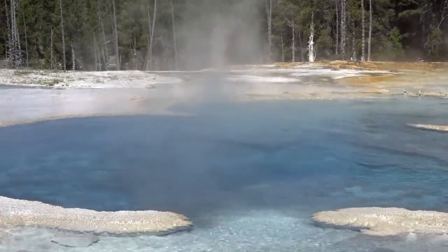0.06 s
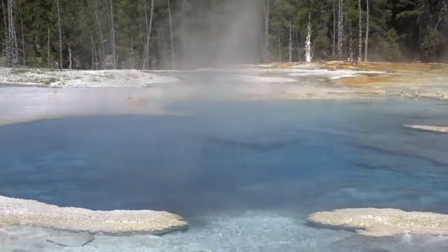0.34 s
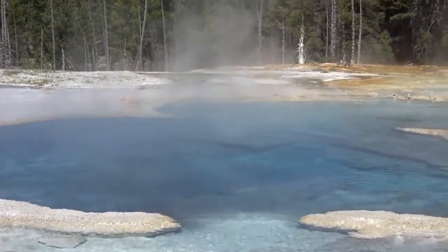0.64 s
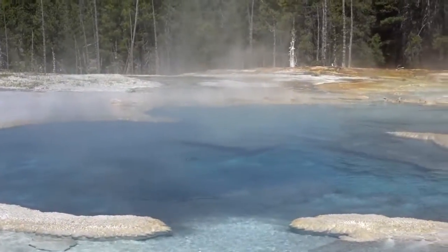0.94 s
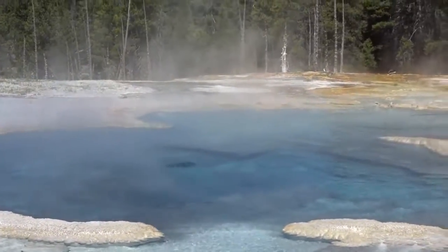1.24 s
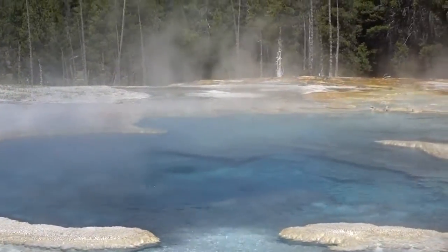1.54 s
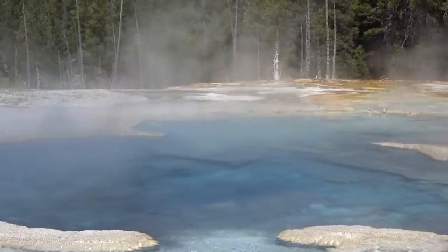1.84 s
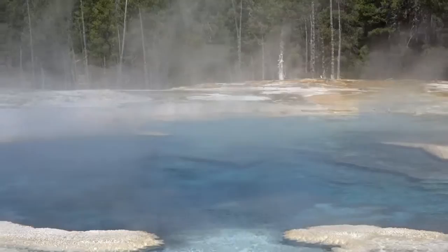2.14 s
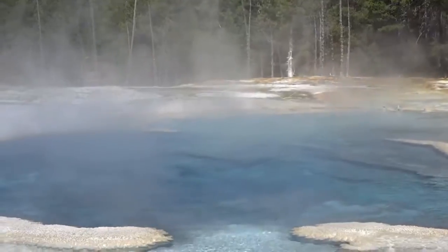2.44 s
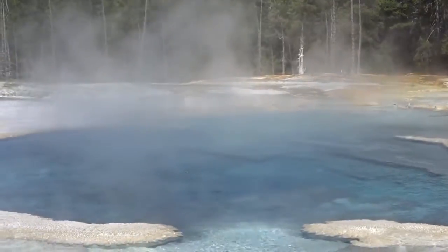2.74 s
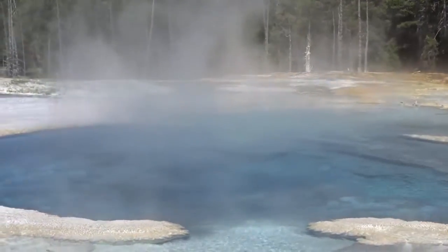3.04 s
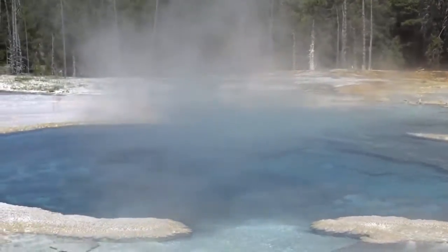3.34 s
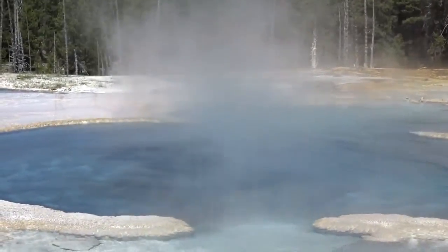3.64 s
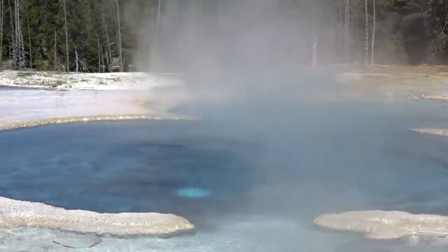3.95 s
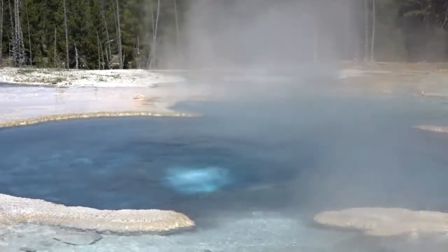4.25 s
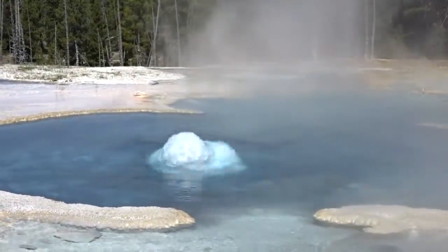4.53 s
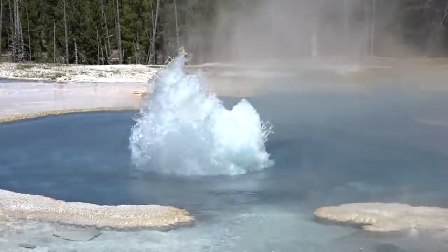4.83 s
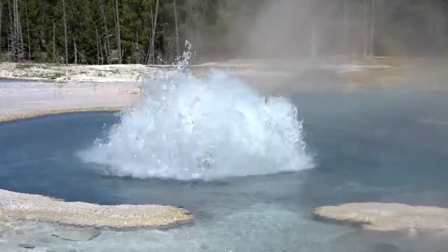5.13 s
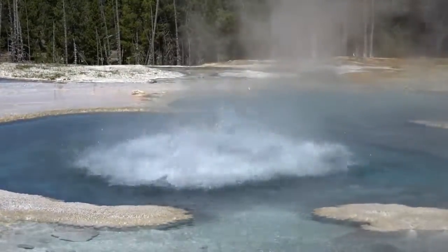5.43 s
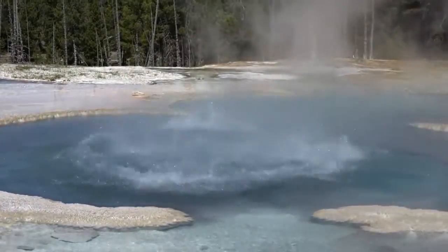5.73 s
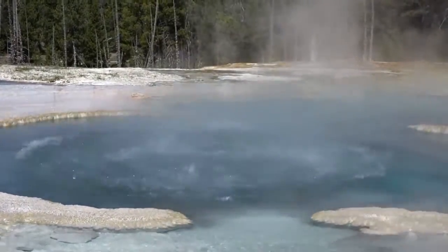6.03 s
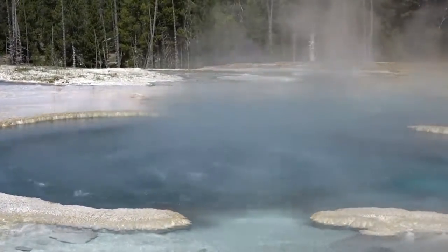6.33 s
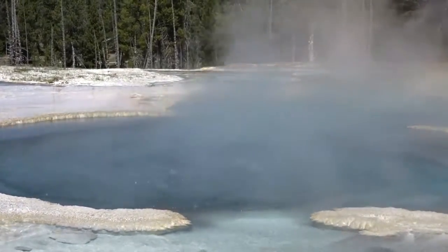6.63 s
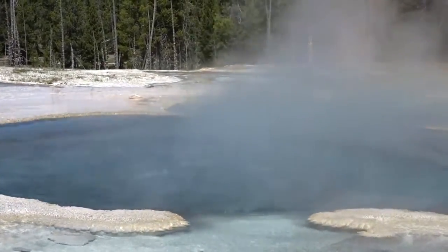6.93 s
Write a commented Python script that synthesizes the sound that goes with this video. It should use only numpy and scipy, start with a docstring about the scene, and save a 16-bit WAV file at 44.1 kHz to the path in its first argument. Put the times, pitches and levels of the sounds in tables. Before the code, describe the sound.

Gusty wind thumps on the microphone outdoors before a gas bubble erupts from a hot pool, raining water down in a splash.

```python
"""A hot spring pool in the open, heard from its edge on a stereo microphone.
Puffs of breeze hiss past on the left and set hollows sounding; spurts of fizz and a few close ticks
come between them. Gusts buffet the microphone as their eddies cross its two ports. Then a gas bubble
bursts: the thrown water rains back as a rush of drops and ringing bubbles, and the foam fizzes away."""
import sys
import numpy as np
from scipy import signal
from scipy.fft import rfft, irfft
from scipy.io import wavfile
from scipy.ndimage import uniform_filter1d

SR = 44100
rng = np.random.default_rng(int(sys.argv[2]) if len(sys.argv) > 2 else 0)


def int16_out(signal):
    """Quantize to a 16-bit WAV file."""
    q = np.round(np.clip(np.atleast_2d(signal).T, -1, 1) * 32767)
    wavfile.write(sys.argv[1], SR, q.astype(np.int16))


N = 307818
TIME = np.arange(N) / SR
FREQ = np.arange(N // 2 + 1) * SR / N

# the strongest eddies to hit the microphone: t/s, level/dB, centre f/Hz
THUMPS = [(0.027, -19, 395), (0.036, -14.5, 710), (0.049, -17, 430), (0.064, -37, 520), (0.098, -23.5, 536),
          (0.152, -24, 424), (0.173, -24, 650), (0.339, -27, 520), (0.345, -6.5, 596), (0.3535, -18, 615),
          (0.359, -26, 560), (0.372, -16, 776), (0.3785, -20, 540), (0.3835, -17, 620), (0.401, -17, 636),
          (0.41, -26, 540), (0.437, -23, 497), (0.4525, -8, 640), (0.457, -23, 450), (0.466, -23, 556),
          (0.476, -25, 620), (0.525, -20.5, 390), (0.532, -19, 450), (0.542, -15, 434), (0.567, -21.5, 460),
          (0.58, -16.5, 530), (0.592, -25, 370), (0.622, -28, 474), (0.644, -21, 387), (0.687, -26, 500),
          (0.7255, -20, 750), (0.7285, -19.5, 372), (0.734, -26, 400), (0.744, -25, 390), (0.754, -19, 470),
          (0.767, -8, 604), (0.776, -21.5, 690), (0.792, -24, 460), (0.820, -26, 580), (0.8275, -9.5, 710),
          (0.8297, -13.5, 710), (0.846, -34, 480), (0.867, -26, 420), (0.884, -29, 340),
          (0.896, -21.5, 695), (0.922, -21, 455), (1.004, -26.5, 380), (1.04, -28.5, 490),
          (1.048, -34, 463), (1.596, -41.5, 267), (1.771, -33.5, 347), (1.927, -23.5, 364),
          (2.009, -37, 350), (2.021, -34, 360), (2.033, -26.5, 380), (2.053, -23, 480), (2.094, -27.5, 420),
          (2.205, -27.5, 350), (2.238, -40, 650), (3.321, -30, 400), (3.332, -24, 410), (3.355, -26, 570),
          (3.366, -23, 390), (3.376, -21.5, 364), (3.383, -30, 290), (3.401, -22, 450), (3.492, -27, 420),
          (3.4965, -19, 470), (3.505, -28.5, 330), (3.514, -22.5, 430), (3.52, -19.5, 350),
          (3.53, -23, 302), (3.546, -32, 420), (3.571, -26.5, 437), (3.579, -32, 378), (3.637, -26, 464),
          (3.767, -34.5, 312), (3.775, -34, 314), (3.856, -38.5, 390), (4.634, -31.5, 264),
          (4.656, -36, 294), (4.671, -30, 298), (4.699, -26, 570), (4.731, -18.5, 427), (4.748, -19.5, 316),
          (4.803, -17.5, 380), (4.809, -21, 620), (4.879, -25.5, 453), (5.584, -21.5, 503),
          (5.689, -26.5, 294), (6.07, -37, 300), (6.972, -35, 340)]


def from_db(db):
    """Decibels to gain."""
    return 10 ** (np.asarray(db) / 20)


def rms_one(x):
    """Scale to unit rms."""
    return x / np.sqrt(np.mean(x ** 2) + 1e-20)


def curve(points):
    """Spread rows of (f/Hz, value) over FREQ, on a log-frequency axis."""
    hz, values = np.transpose(points)
    return np.interp(np.log(FREQ + 1e-9), np.log(hz), values)


def drift(rate_hz):
    """Random wavering, mostly slower than rate_hz; rms 1."""
    return rms_one(irfft(rfft(rng.standard_normal(N)) / (1 + (FREQ / rate_hz) ** 2), N))


def butter(x, hz, kind, order=2):
    """Causal high-, low- or band-pass."""
    return signal.sosfilt(signal.butter(order, hz, kind, fs=SR, output="sos"), x)


def noise_band(hz, width_hz):
    """An airy note: noise around one pitch; rms 1."""
    edges = [max(hz - width_hz / 2, 10), hz + width_hz / 2]
    return rms_one(butter(rng.standard_normal(N), edges, "band"))


def placed(x, pan_db):
    """Set a source pan_db louder on the left than on the right."""
    return x * from_db(np.array([[pan_db], [-pan_db]]) / 2)


def colour(pair, spectrum, likeness, lag_ms=0, pan_db=0):
    """Two unrelated excitations become one stereo sound of this spectrum, lag_ms later on the left."""
    skirts = 1 / (1 + (spectrum[0][0] / (FREQ + 1)) ** 4) / (1 + (FREQ / spectrum[-1][0]) ** 16)
    mid, side = rfft(pair) * from_db(curve(spectrum)) * skirts
    alike, sides = np.clip(curve(likeness), -1, 1), np.array([[1], [-1]])
    stereo = np.sqrt(1 + alike) * mid + np.sqrt(1 - alike) * side * sides
    left, right = irfft(stereo * from_db(sides * pan_db / 2), N)
    left = np.interp(TIME - lag_ms / 1000, TIME, left)
    return np.array([left, right]) / np.std((left + right) / 2)


def plateau(start, hold_s, rise_db_per_s, fall_db_per_s):
    """Gain that rises to 1 at start, holds, then dies away."""
    before_db = rise_db_per_s * np.maximum(start - TIME, 0)
    after_db = fall_db_per_s * np.maximum(TIME - start - hold_s, 0)
    return from_db(-np.minimum(before_db + after_db, 200))


def swells(rows):
    """Bell-shaped swells (t/s, half-width/s, level/dB, ..) add in power; one gain per level column."""
    return np.sqrt(sum(from_db(levels)[:, None] ** 2 * np.exp(-np.minimum(((TIME - s) / width) ** 2, 50))
                       for s, width, *levels in rows))


def breeze():
    """A far murmur of air and water; each puff adds a rush and, from the left, hiss, rustle and air."""
    # passing puffs: t/s, half-width/s, then level/dB of rush, hiss, rustle and airy top
    puffs = [(0.08, 0.19, -48, -60, -71, -82), (0.5, 0.12, -48.5, -63, -75.5, -87),
             (0.92, 0.24, -52.5, -69.5, -73.5, -82.5), (1.13, 0.044, -50, -76, -81, -86),
             (1.25, 0.1, -52.5, -64, -78, -79.5), (1.39, 0.064, -51.5, -66, -80, -81),
             (1.65, 0.22, -50, -66, -79.5, -82), (2.26, 0.19, -51, -62, -79, -88),
             (2.58, 0.12, -54, -62.5, -71.5, -81), (3.45, 0.087, -62, -62.5, -86, -96),
             (3.69, 0.19, -52, -63, -87, -81), (4.5, 0.21, -62.5, -69.5, -91, -83),
             (6.8, 0.19, -62, -63.5, -73, -81)]
    # spectra of the murmur and of a puff's four sounds: f/Hz, level/dB
    murmur_spectrum = [(30, -46.5), (100, -34), (230, -23.5), (400, -7.5), (600, -2.5), (950, 1),
                       (1300, -0.5), (1900, -9), (3000, -19.5), (5000, -29), (8000, -32), (11000, -33.5)]
    rush_spectrum = [(300, -8), (600, -13), (900, -3), (1150, -4), (1340, -2.5), (1500, -13.5),
                     (1900, -18.5), (3000, -54)]
    hiss_spectrum = [(1200, -16), (1900, 10.5), (2400, 6), (3200, 2), (3700, -10), (5000, -17), (6500, -35)]
    rustle_spectrum = [(2800, -13), (3900, 5), (4800, -1.5), (5800, -5), (7500, -18), (8600, -24),
                       (10000, -16), (11500, -15)]
    airy_spectrum = [(6300, 1), (7800, -3), (8800, -6), (10000, -4), (11500, -9)]
    # how alike the two sides hear the air: f/Hz, correlation
    likeness = [(60, 0.97), (570, 0.88), (1200, 0.94), (2500, 0.11), (5300, 0.12), (11000, 0.23)]
    rush_gain, hiss_gain, rustle_gain, airy_gain = swells(puffs)
    white = rng.standard_normal((5, 2, N))
    murmur = colour(white[0], murmur_spectrum, likeness, lag_ms=0.078)
    rush = colour(white[1], rush_spectrum, likeness, lag_ms=0.13, pan_db=2)
    hiss = colour(white[2], hiss_spectrum, likeness, pan_db=16)
    rustle = colour(white[3], rustle_spectrum, likeness, pan_db=24)
    airy = colour(white[4], airy_spectrum, likeness, pan_db=19)
    return (murmur * from_db(-51 + 0.5 * drift(7.7))
            + rush * rush_gain * from_db(1.5 + drift(20))
            + hiss * hiss_gain * from_db(2 + 1.6 * drift(14))
            + rustle * rustle_gain * from_db(0.4 + 1.6 * drift(25))
            + airy * airy_gain * from_db(1.5 * drift(25)))


def hollow_notes():
    """Air blows across hollows a little to the left; each note swells and fades at its own pitch."""
    # notes of the hollows: t/s, half-width/s, level/dB, f/Hz, bandwidth/Hz
    notes = [(0.071, .15, -51.5, 1300, 220), (0.46, 0.097, -53, 1290, 290), (1.4, 0.056, -57, 1500, 170),
             (1.64, 0.077, -46.5, 1313, 140), (2.31, 0.14, -55, 1326, 190), (2.62, 0.1, -55, 1270, 87),
             (3.68, 0.12, -50.5, 1320, 140), (0.08, .17, -66, 2760, 300), (0.5, 0.08, -65.5, 2740, 400),
             (2.28, 0.089, -62.5, 2800, 430), (2.58, .11, -62.5, 2800, 300), (2.48, 0.21, -69, 3300, 350),
             (3.78, 0.11, -62.5, 2200, 280), (6.75, 0.24, -60, 1800, 290), (3.8, 0.14, -69.5, 3230, 250)]
    blown = sum(swells([(s, half_s, db)])[0] * noise_band(hz, width) for s, half_s, db, hz, width in notes)
    return placed(blown, pan_db=7)


def fizz(rise_db_per_s=400, fall_db_per_s=119):
    """Short spurts of fizz on the left: each starts quickly, holds its pitch and fades."""
    # spurts: t/s, hold/s, level/dB, f/Hz, bandwidth/Hz
    spurts = [(0.87, 0.055, -84, 10000, 700), (0.87, 0.085, -80, 5000, 600), (1.12, 0.096, -88, 9700, 900),
              (1.185, 0.06, -68, 3900, 1300), (1.576, 0.17, -66.5, 2500, 1100), (1.7, .06, -83, 6400, 1400),
              (2.12, 0.14, -68, 2860, 1600), (2.59, 0.012, -76, 7600, 650), (2.59, 0.032, -89, 10800, 500),
              (3.615, 0.09, -63, 2470, 990), (3.62, 0.15, -82, 4600, 350), (3.61, 0.28, -83.5, 6700, 980),
              (3.6, 0.14, -85, 9000, 1000)]
    fizzing = sum(from_db(db) * plateau(s, hold, rise_db_per_s, fall_db_per_s) * noise_band(hz, width)
                  for s, hold, db, hz, width in spurts)
    return placed(fizzing, pan_db=19)


def ticks(crack_gain=0.61, crack_s=0.0013, trim_db=-6):
    """Sharp ticks close by: each is a brief crack around its pitch and a few milliseconds of ring."""
    # ticks: t/s, level/dB, f/Hz, ring t60/s, left over right/dB
    hits = [(1.0012, -30, 2820, 0.012, 11), (2.5617, -29.5, 3500, 0.0052, 12.5),
            (5.879, -36, 9200, .003, -3), (6.612, -37, 2850, .009, 14), (6.623, -37, 3520, .007, -3),
            (6.848, -32.5, 2950, 0.0042, 10.5)]
    # modes of a tick: multiple of its pitch, level/dB
    modes = [(.8, -10), (1, 1), (1.17, -4), (1.46, -13), (1.8, -8), (2.5, -15)]
    out, t = np.zeros((2, N)), np.arange(900) / SR
    for s, db, hz, t60, pan_db in hits:
        noise = butter(rng.standard_normal((2, len(t))), [0.72 * hz, 1.16 * hz], "band", order=1)
        crack = crack_gain * rms_one(noise) * np.exp(-t / crack_s)
        tone = sum(from_db(mode_db) * np.sin(2 * np.pi * ratio * hz * t)
                   for ratio, mode_db in modes if ratio * hz < SR / 2)
        tone = butter(tone * from_db(-60 * t / t60), 5360, "low")   # higher modes ring more weakly
        at = round((s + 0.00082) * SR)
        out[:, at:at + len(t)] += from_db(db + trim_db) * placed(tone + crack, pan_db)
    return out


def turbulence(rise_db_per_s=203, wake_lead_s=0.015, wake_decay_s=0.021, lull_db=-89.5):
    """Strength of the air on the ports: fluttering gusts, the wakes of big eddies and a restless lull."""
    # gusts at the microphone: t/s, hold/s, level/dB, fall/(dB/s)
    gusts = [(0.0, 0.29, -47.5, 148), (0.339, 0.72, -46.5, 193), (0.368, 0.02, -41.5, 300),
             (1.25, .22, -78, 109), (1.563, 0.025, -54.5, 114), (1.762, 0.03, -49, 130),
             (1.896, 0.037, -47.5, 118), (2.013, 0.094, -47, 120), (2.199, .02, -50, 75),
             (2.596, .02, -65.5, 90), (2.91, 0.06, -64.5, 60), (3.286, 0.12, -47.5, 250),
             (3.46, 0.087, -48, 150), (3.608, 0.242, -54.5, 128), (4.0, .04, -73, 50),
             (4.486, 0.027, -53.5, 104), (4.647, 0.19, -47, 103), (4.944, 0.78, -54, 193),
             (5.93, 0.058, -62.5, 120), (6.069, 0.0093, -53.5, 130), (6.4, 0.044, -64.5, 120),
             (6.98, 0.06, -57, 100)]
    gust_power = sum((from_db(db) * plateau(s, hold, rise_db_per_s, fall)) ** 2
                     for s, hold, db, fall in gusts)
    gust_power *= from_db(1.73 * drift(22)) ** 2
    wake_power = np.zeros(N)
    for s, db, _ in THUMPS:
        wake_db = -47 + 0.67 * (db + 20)   # a harder thump leaves a stronger wake
        away = np.maximum((s - TIME) / wake_lead_s, (TIME - s) / wake_decay_s)
        wake_power += (from_db(wake_db) * np.exp(-np.minimum(away, 20))) ** 2
    lull_power = from_db(lull_db + 6.2 * drift(8.6)) ** 2
    return np.sqrt(gust_power + wake_power + lull_power)


def eddy_pulses(rows, width_cycles):
    """Each eddy (t/s, gain, f/Hz) is one smooth swing of pressure, about a cycle long."""
    out, near = np.zeros(N), np.arange(-400, 401)
    s, gain, hz = np.transpose(rows)[:, :, None]
    cycles = hz * near / SR
    window = np.exp(-0.5 * (cycles / width_cycles) ** 2)
    swing = np.cos(2 * np.pi * (cycles + rng.random((len(s), 1))))
    np.add.at(out, np.clip((s * SR).astype(int) + near, 0, N - 1), gain * window * swing)
    return out


def small_eddies(gust, count=4400, base_hz=400, base_db=-45, brightest_db=-43.5):
    """A swarm of eddies; a stronger gust brings faster, brighter ones, up to brightest_db."""
    pitch_scatter, size_scatter = np.clip(rng.standard_normal((count, 2)), -2, 2).T
    s = rng.uniform(0, TIME[-1], count)
    gust_db = np.interp(s, TIME, np.minimum(20 * np.log10(gust), brightest_db))
    hz = base_hz * from_db(1.1462 * (gust_db - base_db) + 4 * pitch_scatter)
    pulses = eddy_pulses(np.c_[s, from_db(2.5 * size_scatter), hz], width_cycles=0.3)
    return butter(pulses, 215, "high", order=1)


def big_eddies():
    """Single thumps on the microphone; the harder the thump, the fewer cycles it lasts."""
    s, db, hz = np.transpose(THUMPS)
    width_cycles = np.clip(0.37 - 0.0042 * (db[:, None] + 24.5), 0.2, 0.6)
    return butter(eddy_pulses(np.c_[s, from_db(db - 0.5), hz], width_cycles), 120, "high", order=1)


def rumble_power(x):
    """Running power of the lows."""
    return uniform_filter1d(butter(x, 224, "low", order=4) ** 2, size=1500) + 1e-12


def buffeting(port_turn_hz=520):
    """Wind on the microphone: eddies cross the left port, then the right."""
    gust = turbulence()
    eddies, thumps = small_eddies(gust), big_eddies()
    strength = gust * from_db(-2.5)
    # the small eddies are turned down around each loud thump
    strength = strength ** 2 / np.sqrt(strength ** 2 + 0.14 * rumble_power(thumps))
    wind = eddies * strength / np.sqrt(rumble_power(eddies)) + thumps
    # hard shoves on the diaphragm turn slightly lopsided, which gives them an edge
    wind = wind + 0.52 * butter(wind ** 2, 620, "high")
    left = butter(butter(wind, 126.5, "high"), 1270, "low")
    # the right port follows late, the lows by more than the highs: a first-order all-pass
    right = 2 * butter(left, port_turn_hz, "low", order=1) - left
    # a faint deep rumble lies under it, partly each port's own and partly shared
    noise = rng.standard_normal((2, N)) + 0.64 * rng.standard_normal(N)
    rumble = 0.13 * strength * rms_one(butter(noise, 190, "low"))
    return np.array([left * from_db(0.83), right * from_db(2)]) + butter(rumble, 27, "high", order=1)


def grains(per_s, spread_db):
    """Two trains of random impacts, their sizes scattered by spread_db."""
    sizes = from_db(spread_db * np.minimum(rng.exponential(1, (2, N)), 5))
    signs = rng.choice([-1, 1], (2, N))
    return rms_one(sizes * signs * (rng.random((2, N)) < per_s / SR))


def ring(clicks, hz, t60):
    """A unit click sets a sine of height 1 ringing."""
    r, w = from_db(-60 / (t60 * SR)), 2 * np.pi * hz / SR
    return signal.lfilter([0, np.sin(w)], [1, -2 * r * np.cos(w), r * r], clicks + 1e-18)


def bubbles(per_s, low_hz, high_hz, cycles, sizes=36):
    """Trapped bubbles of many sizes, each ringing down by 60 dB in this many cycles."""
    births, size = grains(per_s, spread_db=2), rng.integers(0, sizes, N)
    pitches = np.geomspace(low_hz, high_hz, sizes) * rng.uniform(0.98, 1.02, sizes)
    return rms_one(sum(hz * ring(births * (size == k), hz, cycles / hz) for k, hz in enumerate(pitches)))


def splats(decay_s=0.0032):
    """Gain of the fat drops after the pour: each lands at once and dies in a few milliseconds."""
    # landings: t/s, level/dB
    landings = [(5.7048, -44), (5.728, -42), (5.879, -48.5), (5.914, -52), (5.9796, -47), (6.0485, -51),
                (6.0535, -54), (6.248, -43.5), (6.3001, -43), (6.316, -48), (6.336, -43), (6.388, -49),
                (6.4612, -58)]
    return sum(from_db(db) * (TIME >= s) * np.exp(-np.clip((TIME - s) / decay_s, 0, 30))
               for s, db in landings)


def downpour(shape, slops, tear_s=4.68, attack_s=0.021, pour_s=5.144, hold_s=0.3):
    """Gain of one sound of the burst: silent until the dome of water tears, then pour, foam and slops."""
    pour_db, build, die, foam_db, fade = shape
    pour = from_db(pour_db) * plateau(pour_s, hold_s, build, die)
    foam = from_db(foam_db) * plateau(pour_s, hold_s, build, fade)
    return np.clip((TIME - tear_s) / attack_s, 0, 1) * np.sqrt(pour ** 2 + foam ** 2 + slops ** 2)


def burst():
    """Water thrown by the gas bubble falls back: it churns bubbles in, drops slap, spray sizzles."""
    # course of each sound: pour level/dB, build/(dB/s), fall/(dB/s), foam level/dB, foam fade/(dB/s)
    churn_shape = (-33.5, 23.5, 54, -41.5, 11)
    drops_shape = (-40, 37.5, 84, -45.5, 17.5)
    spray_shape = (-45.5, 71, 104, -56, 17.5)
    # spectrum of each sound: f/Hz, level/dB
    churn_spectrum = [(25, -31), (120, -27), (300, -11.5), (520, -2.5), (730, -9.5), (950, -2.5), (1250, 1),
                      (1500, -3), (1800, -14.5), (2400, -11)]
    drops_spectrum = [(1300, -34), (1900, -3.5), (2400, 1.5), (2650, 0), (2880, -7.5), (3150, 4),
                      (3900, -0.5), (4800, -6), (5400, -16.5), (7000, -14.5)]
    spray_spectrum = [(4500, 11), (5500, -5.5), (6200, 0.5), (6800, -2.5), (7100, 2.5), (7700, 1.5),
                      (8500, -9), (9500, -4.5), (10300, 0), (11500, -10)]
    # single slops of water: t/s, half-width/s, then level/dB of churn, drops and spray
    slops = [(4.712, 0.0099, -39, -62, -69), (5.36, 0.063, -34.5, -43.5, -47.5),
             (5.51, 0.046, -35, -52, -49), (5.69, 0.055, -42.5, -69, -80), (6.32, 0.059, -49.5, -58.5, -83),
             (6.65, 0.0088, -46.5, -67.5, -82), (6.81, 0.05, -52, -66, -78)]
    # how alike the two sides hear the pool: f/Hz, correlation
    likeness = [(100, 0.86), (570, 0.98), (1200, 0.94), (3500, 0.86), (6000, 0.48), (11000, 0.41)]
    # the two ports hear the pool in different colours: f/Hz, left over right/dB
    balance = [(500, 0.5), (1200, 1.5), (1850, 3.5), (2250, -5.5), (2800, -3.5), (3800, -3), (4900, 4.5),
               (6000, -12), (7200, 1.5), (8500, 0), (10000, 0)]
    churn_gain, drops_gain, spray_gain = map(downpour, (churn_shape, drops_shape, spray_shape), swells(slops))
    wash, pan_db = rng.standard_normal((3, 2, N)), curve(balance)
    gurgle = bubbles(per_s=2500, low_hz=307, high_hz=2190, cycles=14.7)
    churn = colour(gurgle + 4.46 * wash[0], churn_spectrum, likeness, lag_ms=0.082, pan_db=pan_db)
    # one rain of impacts sounds in both slap and sizzle; when they are fewer, each stands out more
    flow = drops_gain / drops_gain.max()
    per_s = 9000 * np.maximum(flow, 0.04) ** 1.1
    impacts = np.sqrt(per_s.mean() / per_s) * grains(per_s, spread_db=-0.5)
    pings = bubbles(per_s=1100, low_hz=1780, high_hz=5117, cycles=200)   # tiny bubbles trapped by drops
    drops = colour(impacts + 0.3 * pings + 0.5 * wash[1], drops_spectrum, likeness, pan_db=pan_db)
    spray = colour(impacts + 1.7 * wash[2], spray_spectrum, likeness, pan_db=pan_db)
    # the thinner the pour, the more the drops land in clumps
    patter = from_db(0.5 * (1 - flow) * (drift(81) + 0.44))
    splat = colour(wash[2], drops_spectrum, likeness, pan_db=pan_db)
    splat += from_db(-28) * colour(wash[1], spray_spectrum, likeness)
    return (churn * churn_gain * from_db(0.23 * drift(25))
            + drops * drops_gain * patter
            + spray * spray_gain * from_db(0.88 * drift(36))
            + splat * splats())


def scene():
    """Open air: every source reaches the microphone directly."""
    return buffeting() + breeze() + hollow_notes() + fizz() + burst() + ticks()


def record(dry):
    """The top is cut steeply above 11150 Hz."""
    return signal.sosfilt(signal.ellip(12, 0.2, 70, 11150, fs=SR, output="sos"), dry)


dry = scene()
out = record(dry)
int16_out(out)
```